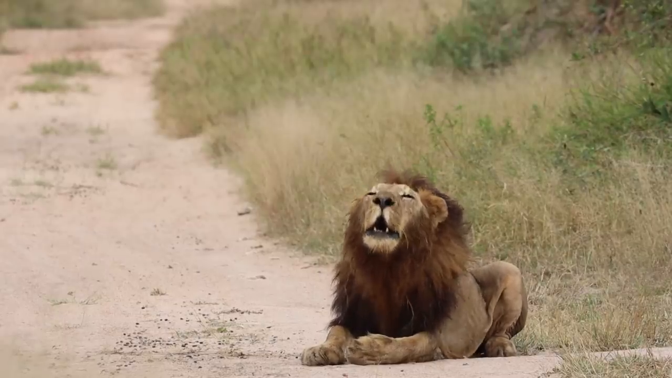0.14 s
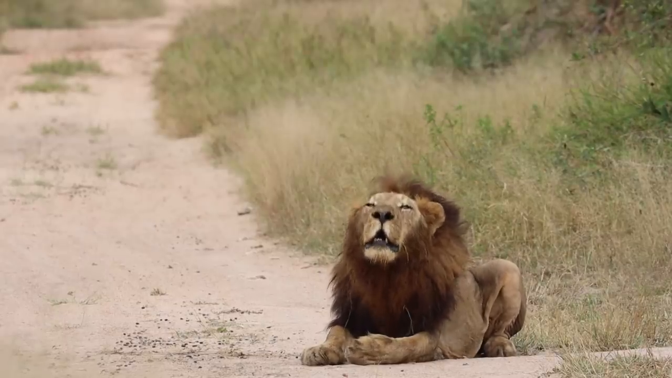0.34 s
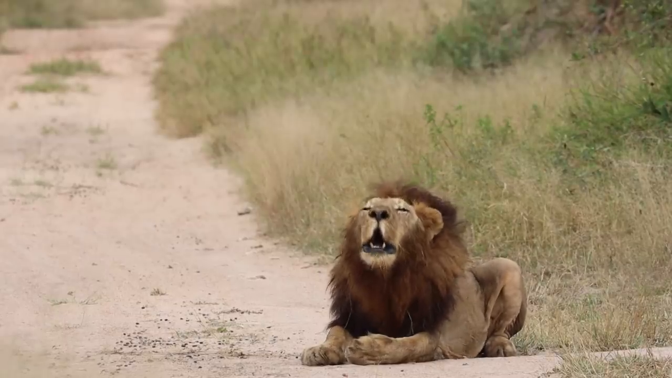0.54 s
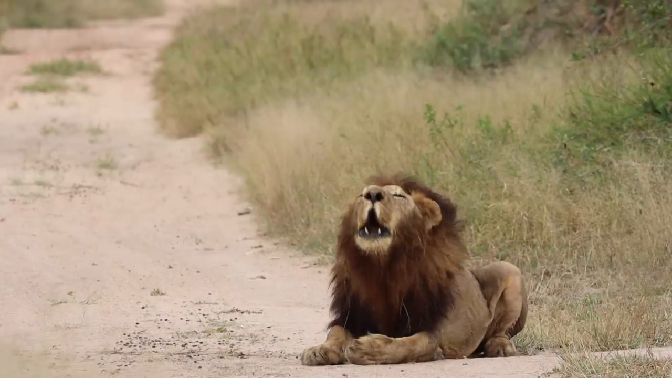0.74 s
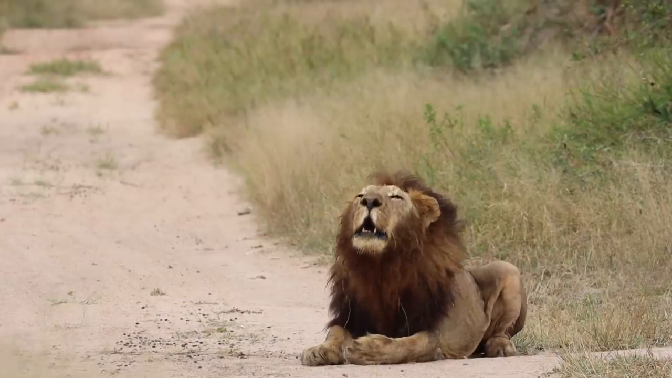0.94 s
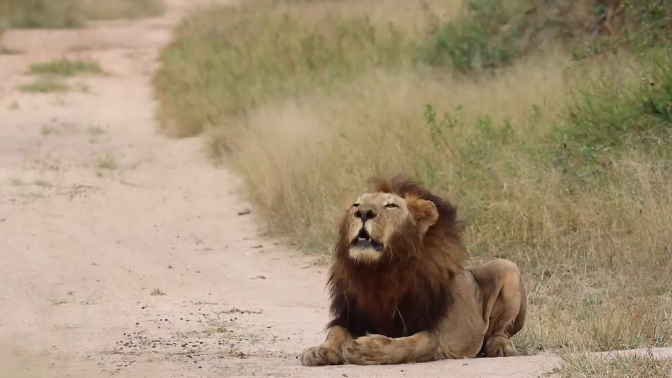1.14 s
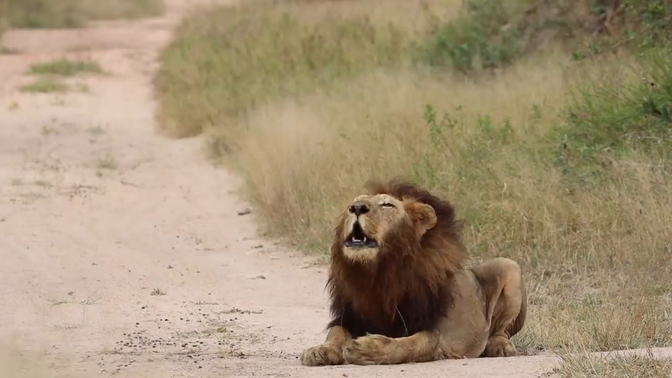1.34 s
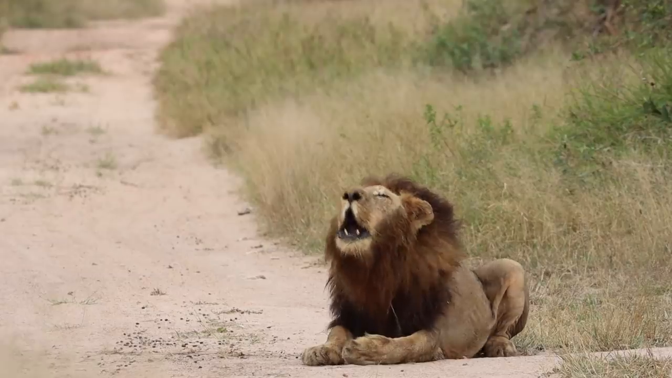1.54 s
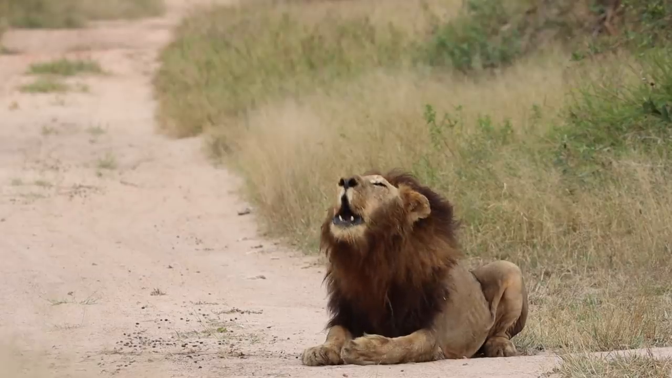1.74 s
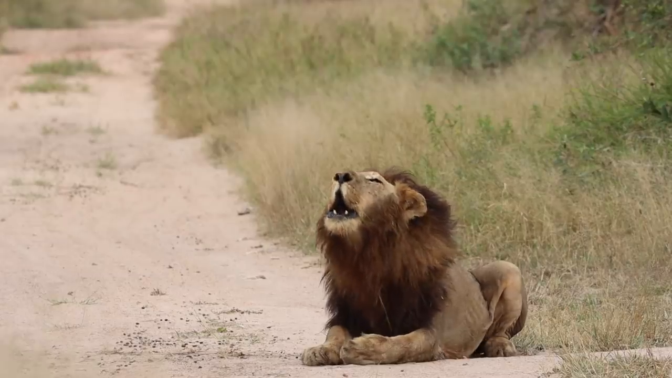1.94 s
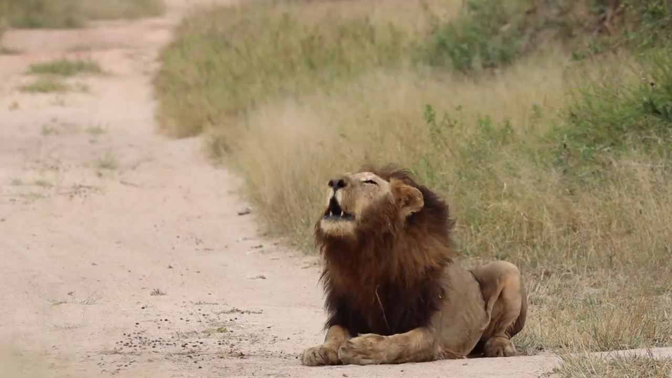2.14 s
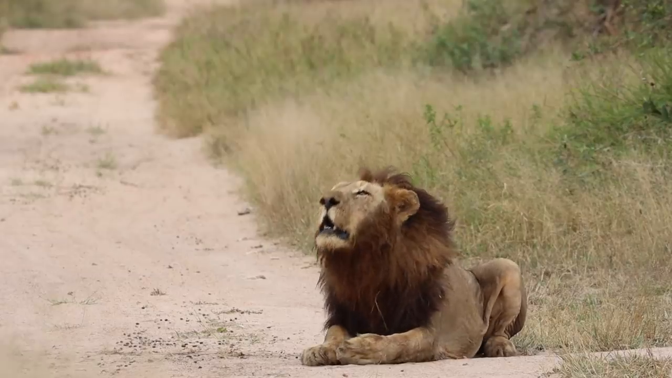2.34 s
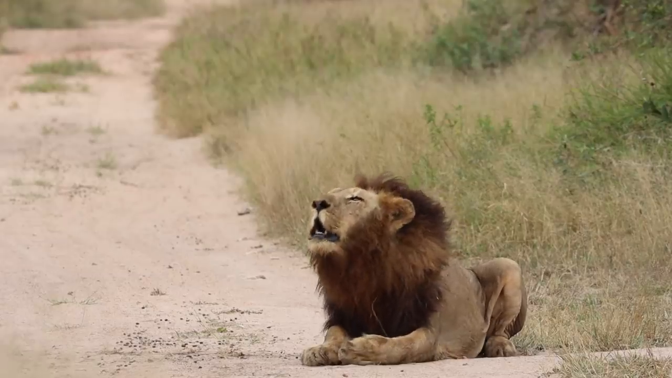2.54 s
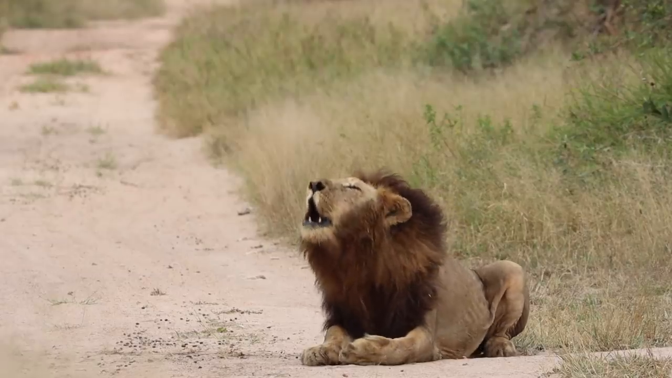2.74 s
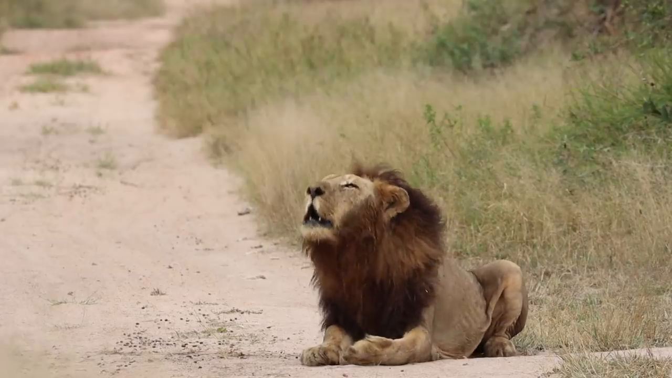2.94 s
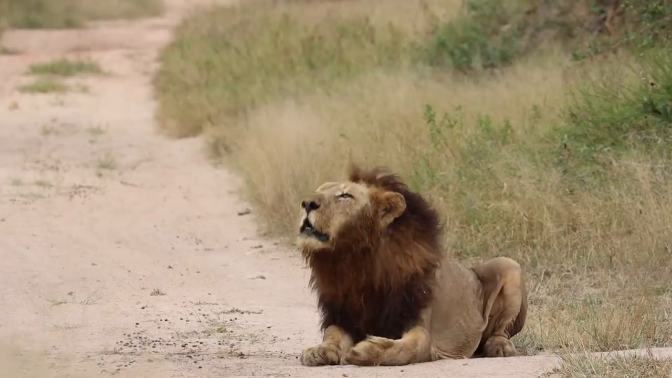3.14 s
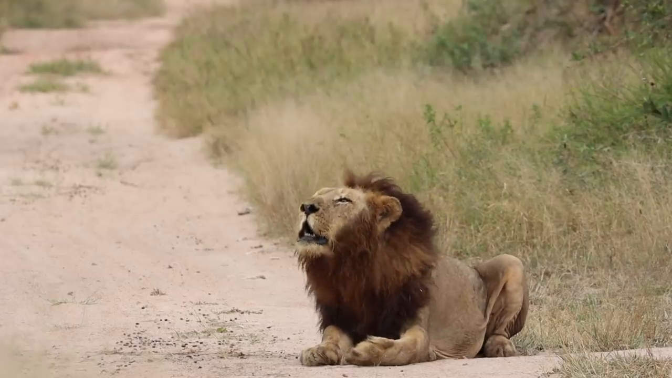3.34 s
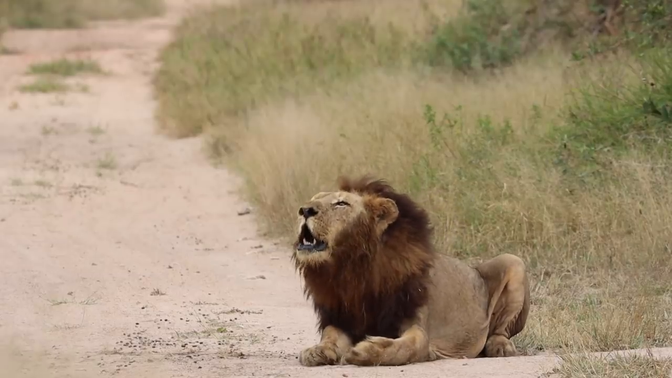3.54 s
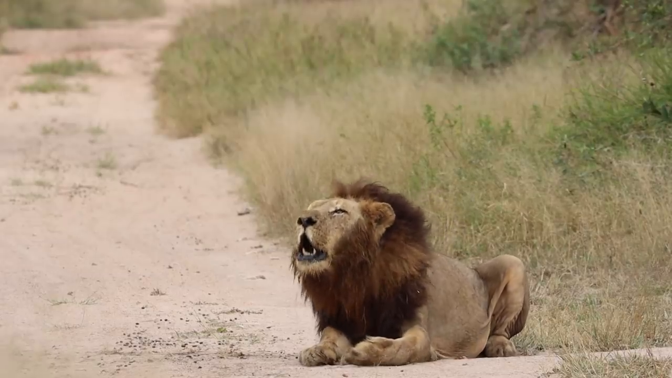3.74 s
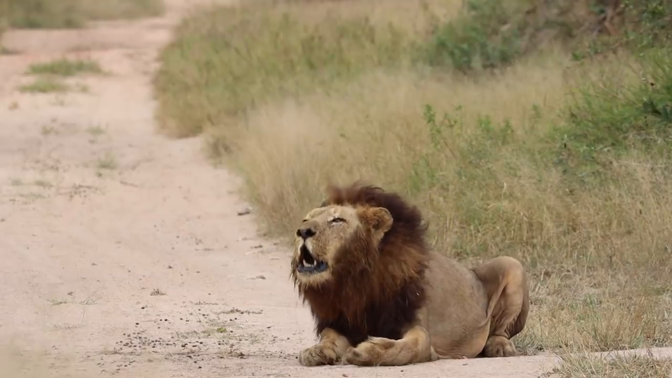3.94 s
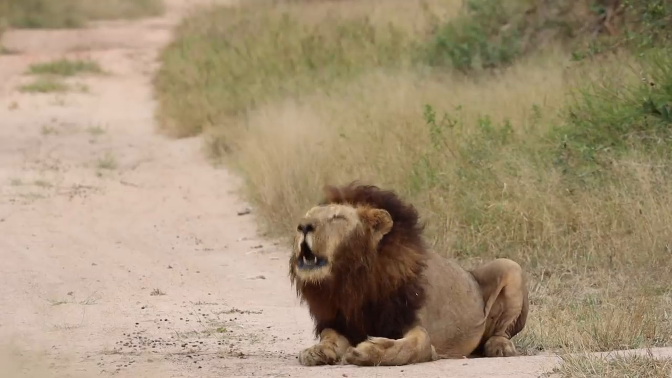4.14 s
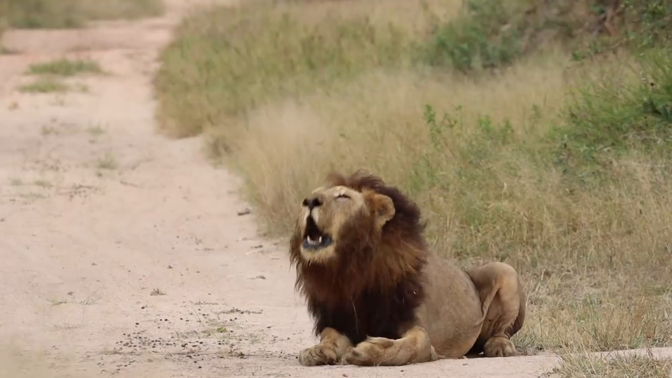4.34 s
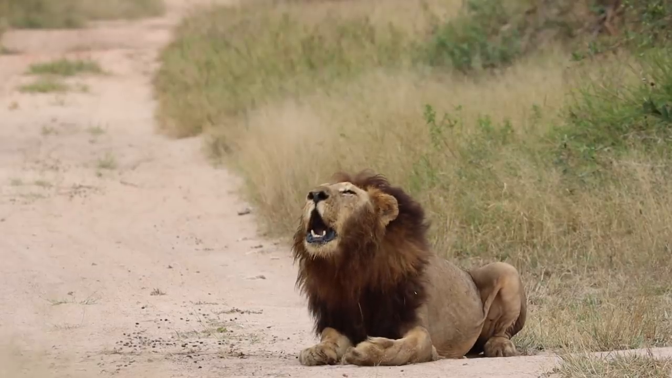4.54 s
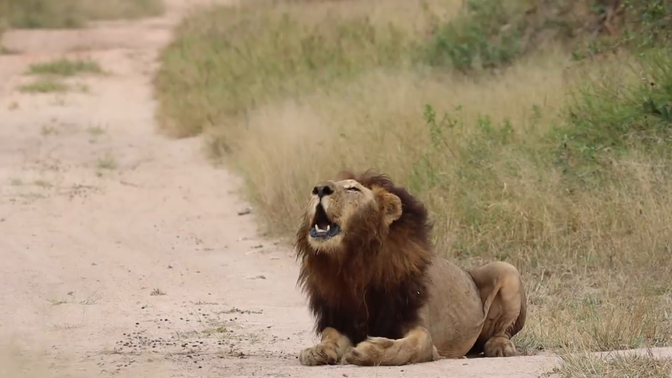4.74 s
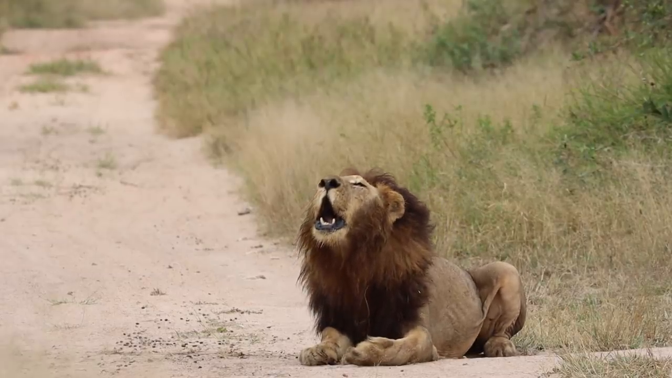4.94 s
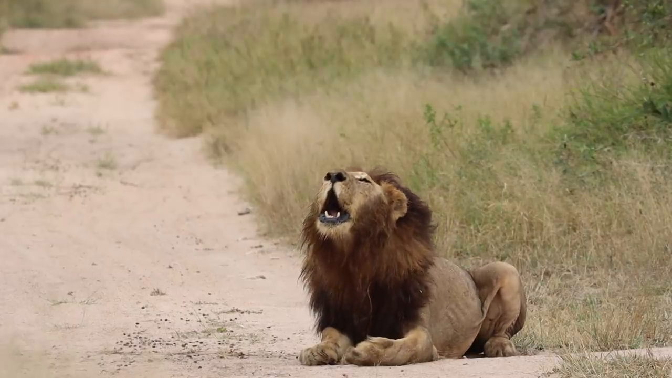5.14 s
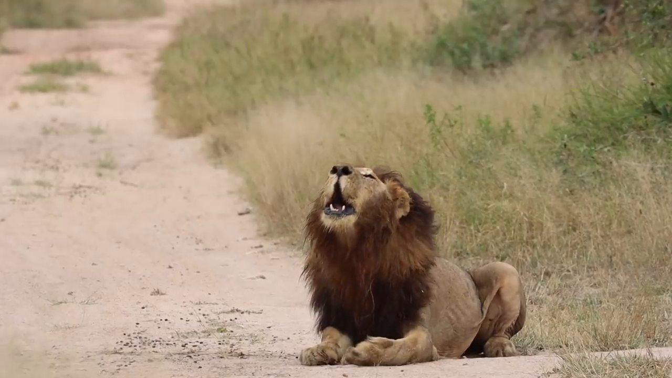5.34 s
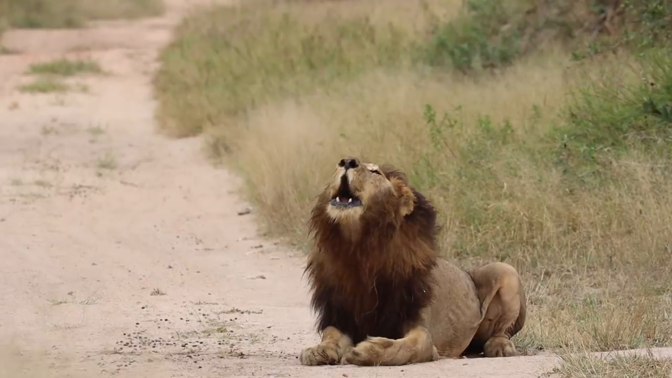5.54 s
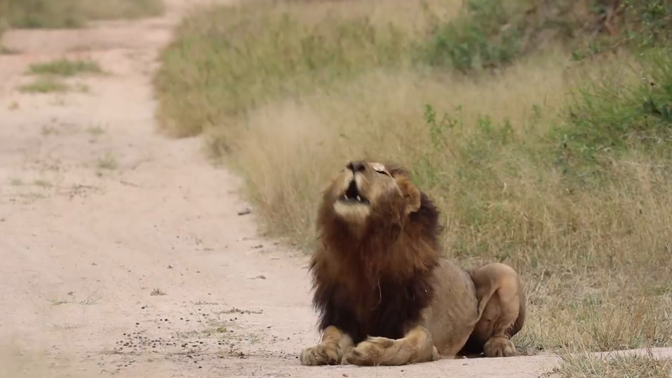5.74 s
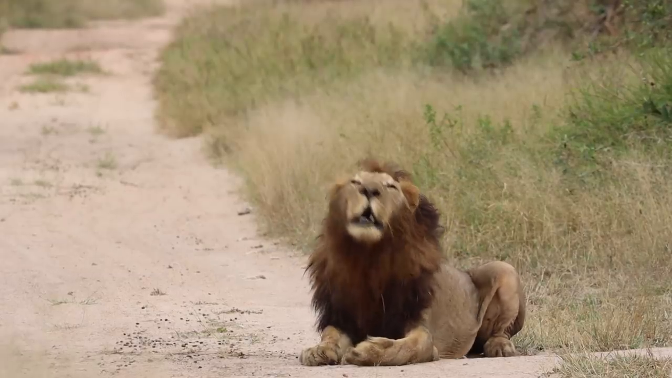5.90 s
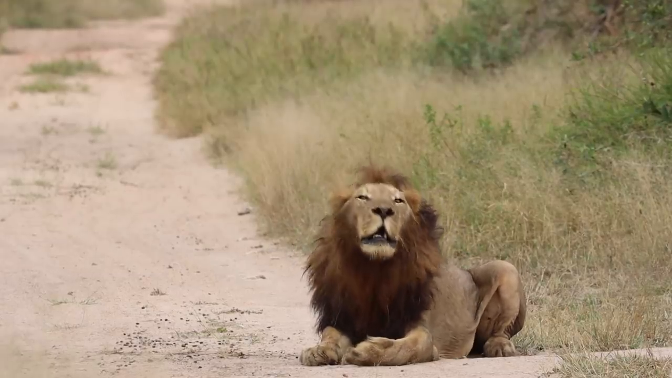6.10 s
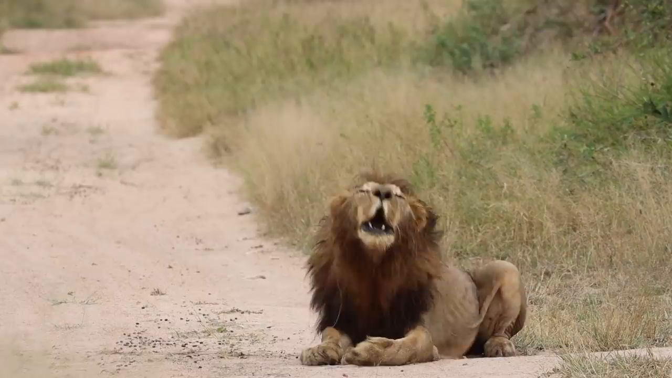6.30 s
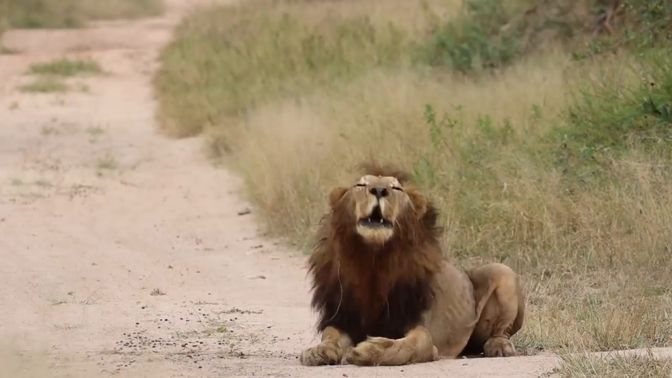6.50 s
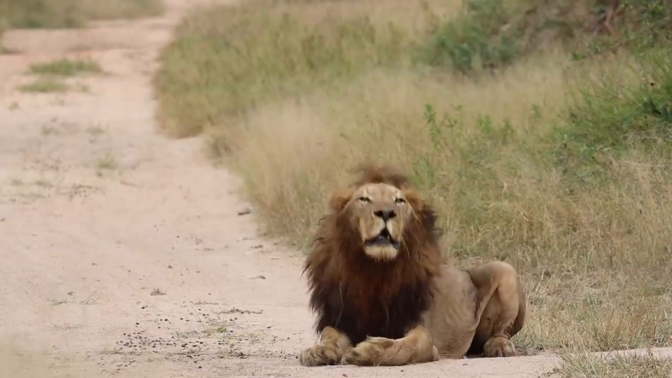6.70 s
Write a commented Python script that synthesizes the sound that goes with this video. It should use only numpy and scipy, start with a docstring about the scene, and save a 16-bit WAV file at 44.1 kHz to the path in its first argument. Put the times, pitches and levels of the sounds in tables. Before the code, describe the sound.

Deep, raspy lion grunts sag in pitch, followed by one long moaning roar and a last short grunt, echoing dully across open grassland.

```python
"""On a sandy track in open bush a male lion calls: four hoarse grunts, a long moan breaking into a roar, one more grunt.
The voice is a sine fundamental plus overtones when the folds swing evenly, or resonated fold slaps when they rasp.
Fluttering noise gives snored breaths in before four calls; sliding sines give throat bubbles and far bird chirps.
Narrow pulsing noise makes insects, shaped noise the air in leaves, short ringing modes the grass ticks.
A decaying noise tail returns a dull echo of the lion; faint microphone hiss lies in the top octave."""
import sys
import numpy as np
from scipy import signal
from scipy.fft import rfft, irfft, next_fast_len
from scipy.io import wavfile
from scipy.ndimage import uniform_filter1d, map_coordinates

SR = 44100
rng = np.random.default_rng(int(sys.argv[2]) if len(sys.argv) > 2 else 0)


def invert_db(level):
    """Linear amplitude ratio for a level in decibels (20 dB per decade), elementwise."""
    return 10 ** (np.asarray(level, dtype=float) / 20)


def wav_record(signal):
    """Record a signal, one row per channel, as 16-bit PCM in the file named by sys.argv[1]."""
    frames = np.transpose(np.atleast_2d(signal))
    bounded = np.clip(frames, -1, 1)
    # unit amplitude maps onto the largest positive 16-bit level
    quanta = np.round(bounded * 32767).astype(np.int16)
    wavfile.write(sys.argv[1], SR, quanta)


N = 298116
TIME = np.arange(N) / SR

# Breath colour at the front of the mouth. Each row: frequency in Hz, relative density in dB per Hz.
TEETH_COLOUR = [(1300, -23), (1900, -11.5), (2380, -8), (2750, -7.5), (3160, -7.5), (3620, -9.5),
                (4400, -9.5), (5300, -10.5), (6200, -18), (7000, -37), (8500, -52)]
# Colour of thin air at the lips. Each row: frequency in Hz, relative density in dB per Hz.
LIP_AIR_COLOUR = [(5500, -20), (7000, 3.5), (8300, -0.5), (10000, -2.5), (12300, 2), (13500, -11),
                  (15600, -21)]


def unit(x):
    """Scale to rms 1."""
    return x / np.sqrt(np.mean(x ** 2) + 1e-20)


def along(points, hz):
    """Interpolate (Hz, value) points on a log frequency axis."""
    f, v = np.transpose(points)
    return np.interp(np.log(hz + 1), np.log(f + 1), v)


def curves(rows):
    """One value per sample for each column after the time, corners rounded over 10 ms."""
    s, *cols = np.transpose(rows)
    return [uniform_filter1d(np.interp(TIME, s, c), size=SR // 100).round(decimals=6) for c in cols]


def sounding(tables):
    """1 inside the time span of each table, fading to 0 outside."""
    fade_s = .02
    gates = []
    for rows in tables:
        inside_s = np.minimum(TIME - rows[0][0], rows[-1][0] - TIME)
        gates.append(np.clip(1 + inside_s / fade_s, 0, 1))
    return np.clip(sum(gates), 0, 1)


def wobble(rate):
    """Smooth random curve, rate knots a second."""
    return map_coordinates(rng.standard_normal(int(N * rate / SR) + 4), [TIME * rate])


def filtered(x, response):
    """Multiply the spectrum of x by a complex response of frequency."""
    m = next_fast_len(N + SR // 2)
    return irfft(rfft(x, m) * response(np.fft.rfftfreq(m, 1 / SR)), m)[..., :N]


def coloured(x, points):
    """Shape x by (Hz, dB) points and scale to rms 1."""
    return unit(filtered(x, lambda hz: invert_db(along(points, hz))))


def resonant(x, peaks, low_hz):
    """Causal resonances (Hz, width Hz, dB) and a steep low cut, held at a running rms of 1."""
    def response(f):
        body = 0
        for k, (centre, width, db) in enumerate(peaks):
            body = body + (-1) ** k * invert_db(db) * 1j * f * width / (centre ** 2 - f * f + 1j * f * width)
        cut = (-f * f / (low_hz ** 2 - f * f + 1.4j * f * low_hz)) ** 2
        return body * cut

    y = filtered(x, response)
    return y / np.sqrt(np.abs(uniform_filter1d(y ** 2, SR // 16)) + 1e-12)


def patches(x, depth_db, size, bins, frames):
    """Random gain in soft patches over time and frequency."""
    z = signal.stft(x, nperseg=size)[2]
    field = uniform_filter1d(rng.standard_normal(z.shape[-2:]), bins, 0)
    field = uniform_filter1d(field, frames, 1)
    return signal.istft(z * invert_db(depth_db * unit(field)), nperseg=size)[1][..., :N]


def glides(rows):
    """Short sines sliding linearly in pitch under a half-sine swell."""
    out = np.zeros(N + SR)
    for s, db, start_hz, end_hz, length_s in rows:
        u = np.linspace(0, 1, round(length_s * SR))
        tone = np.sin(2 * np.pi * length_s * (start_hz * u + (end_hz - start_hz) * u ** 2 / 2))
        out[round(s * SR):][:len(u)] += invert_db(db) * np.sqrt(2) * np.sin(np.pi * u) * tone
    return out[:N]


def microphone_hiss():
    """Faint steady microphone noise, heard in the top octave."""
    hiss = filtered(rng.standard_normal((2, N)), lambda hz: 1 / (1 + (11000 / (hz + 1)) ** 6))
    return invert_db(-76.5) * unit(hiss)


def bush():
    """Soft air in grass and leaves: shaped noise whose stereo likeness varies with frequency."""
    # Each row: frequency in Hz, relative density in dB per Hz.
    colour = [(25, -35), (70, -6.5), (140, 0.5), (250, -11), (420, 2.5), (550, -3), (700, -7.5),
              (850, -6.5), (1160, -7.5), (1700, -15), (3300, -20), (6700, -24.5), (12000, -29),
              (14000, -33), (15700, -38.5)]
    # Each row: frequency in Hz, left-right correlation.
    likeness = [(60, 0.37), (240, 1), (950, -0.0099), (3770, -0.085), (15000, -0.12)]
    mid_rms_db = -54.5

    def response(hz):
        angle = np.arccos(np.clip(along(likeness, hz), -1, 1)) / 2
        return invert_db(along(colour, hz)) * [np.cos(angle), np.sin(angle)]

    pair = patches(rng.standard_normal((2, N)), depth_db=1.0, size=512, bins=5, frames=12)
    mid, side = filtered(pair, response)
    return invert_db(mid_rms_db) * np.array([mid + side, mid - side]) / np.std(mid)


def insects():
    """Shrill insects: narrow pulsing noise bands, nearly alike in both channels."""
    # Each row: centre in Hz, half-width in Hz, rms level in dB, pulses per second.
    bands = [(2365, 68, -69, 55), (6550, 90, -80, 6.7)]
    out = np.zeros((2, N))
    for hz, width, db, rate in bands:
        pulse = 1 + .7 * np.cos(2 * np.pi * rate * TIME + 2 * wobble(7.5))
        pulse *= invert_db(2.2 * wobble(0.9))
        band = filtered(pulse * rng.standard_normal((2, N)), lambda f: 1 / (1 + ((f - hz) / width) ** 2))
        out += invert_db(db) * unit(band + 0.86 * band[::-1])
    return out


def far_birds():
    """Far chirps: short sliding sines, stronger on the left."""
    # Each row: start in seconds, mid-channel level in dB, start in Hz, end in Hz, length in seconds.
    chirps = [(.28, -72, 7600, 8000, .08), (.49, -70, 8000, 8900, .05), (1.05, -69, 2120, 2400, .14),
              (2.2, -69, 2120, 2400, .14), (2.4, -70, 9500, 8500, .05), (3.36, -69, 2000, 2300, .14),
              (3.49, -68, 7800, 8400, .045), (3.535, -72, 8500, 9000, .02)]
    return glides(chirps) * invert_db(np.array([[2], [-2]]))


def echo(x, spread=0.19):
    """Ground, grass and trees scatter the call back; each frequency dies at its own speed."""
    # Each row: frequency in Hz, t60 in seconds.
    decay = [(100, 0.43), (150, 1.35), (400, 1), (1500, 0.5), (8000, 0.067)]
    # Each row: frequency in Hz, relative level in dB.
    colour = [(60, -51.5), (140, -19.5), (400, -34.5), (1500, -14.5), (8000, -33.5)]
    hz, t, z = signal.stft(rng.standard_normal((2, 2 * SR)), SR, nperseg=1024)
    z = z * invert_db(-60 * t / along(decay, hz)[:, None])
    z = z / np.linalg.norm(z[0], axis=1)[:, None]
    tails = signal.istft(z, SR, nperseg=1024)[1]
    shared, apart = tails / np.linalg.norm(tails[0])
    far = filtered(x, lambda f: invert_db(along(colour, f)))
    stereo_tail = [shared + spread * apart, shared - spread * apart]
    return signal.fftconvolve(far[None], stereo_tail, axes=1)[:, :N]


def ticks():
    """Nearby grass ticks: a few short modes ringing after a fast onset."""
    # Each row: time in seconds, nominal peak in dB.
    times = [(1.186, -42), (1.465, -29), (3.389, -41.5), (3.598, -41.5), (4.101, -41)]
    # Modes of what ticks. Each row: frequency in Hz, relative level in dB, t60 in seconds.
    modes = [(1170, 5.5, 0.035), (2380, 2, 0.032), (4450, -5, 0.023)]
    out, t = np.zeros(N + SR), TIME[:SR // 20]
    for s, db in times:
        ring = 0
        for hz, level_db, t60_s in modes:
            ring = ring + invert_db(level_db + rng.normal(0, 0.82) - 60 * t / t60_s) * np.sin(2 * np.pi * hz * t)
        onset = 1 - np.exp(-t / .0004)
        out[round(s * SR):][:len(t)] += invert_db(db - 7.5) * ring * onset
    return out[:N]


def inhale():
    """Air drawn in makes the soft palate flutter near 30 Hz: a soft snore through resonances."""
    # Each row: peak in seconds, snore level in dB, swell in seconds.
    peaks = [(.63, -41.5, 0.24), (1.518, -32.5, 0.22), (2.668, -42.5, 0.22), (6.292, -40.5, 0.11)]
    swell_db, cut_s, cut_db = 17.5, 0.049, 8  # rise to the peak, then a quick drop
    mouth_db, hiss_db, thin_db = -6, -18.5, -33.5  # relative to the snore
    breaths = [[(s - swell_s, db - swell_db), (s, db), (s + cut_s, db - cut_db)] for s, db, swell_s in peaks]
    snore_db, = curves(np.concatenate(breaths))
    flutter = invert_db(4.6 * np.cos(2 * np.pi * 30 * TIME + 5.2 * wobble(22)) + 1.95 * wobble(40))
    air = flutter * rng.standard_normal((4, N))
    snore = resonant(air[0], [(94.4, 41, -5.0), (171.6, 21.6, 4.0)], low_hz=50.2)
    mouth = resonant(air[1], [(404, 47, 5.5), (744, 80, -5), (1047, 120, -7.0)], low_hz=220)
    hiss = coloured(air[2], TEETH_COLOUR)
    thin = coloured(air[3], LIP_AIR_COLOUR)
    layers = snore + invert_db(mouth_db) * mouth + invert_db(hiss_db) * hiss + invert_db(thin_db) * thin
    return sounding(breaths) * invert_db(snore_db + 0.9 * wobble(18)) * layers


def throat_bubbles():
    """Bubbles in the throat: short sines gliding in pitch."""
    # Each row: start in seconds, level in dB, start in Hz, end in Hz, length in seconds.
    gulps = [(2.12, -29, 520, 750, .03), (5.722, -22, 560, 880, .045), (5.77, -23, 390, 480, .045),
             (5.805, -32, 550, 950, .04)]
    return glides(gulps)


def pitch_curve():
    """Fold rate in Hz: each grunt holds, then sags; the long call follows its own line."""
    # Each row: start in seconds, sag start in seconds, held Hz, sag end in seconds, last Hz.
    grunts = [(0, -0.001, 158.2, .19, 106.4), (0.681, 0.719, 152.7, .92, 121.1),
              (1.58, 1.832, 152.3, 2.15, 121.7), (2.722, 2.857, 139.7, 2.95, 121),
              (6.381, 6.48, 144.4, 6.53, 119.6)]
    # Moan and roar. Each row: time in seconds, pitch in Hz.
    moan = [(4.171, 125.1), (4.22, 135.1), (4.265, 153.9), (4.324, 155.8), (4.392, 194.4), (4.436, 215.7),
            (4.468, 220), (4.513, 220), (4.556, 210.8), (4.616, 209.9), (4.666, 214.6), (4.706, 215.2),
            (4.732, 200), (4.925, 190.2), (4.99, 195.4), (5.104, 193.1), (5.14, 205.8), (5.259, 206.5),
            (5.29, 169.3), (5.468, 164.4), (5.512, 156.5), (5.574, 156.9), (5.663, 140.1), (5.71, 139.4),
            (5.75, 120)]
    points = []
    for s, sag_s, hz, end_s, end_hz in grunts:
        points += [(s, hz), (sag_s, hz), (end_s, end_hz), (end_s + .2, end_hz)]
    last_s, last_hz = moan[-1]
    return curves(sorted(points + moan + [(last_s + .3, last_hz)]))[0]


def fold_state():
    """Vocal-fold settings over time, gliding from one way of working to the next."""
    # Each way: rasp share of the throat band 0-1, rasp share above it 0-1, disorder 0-1,
    # depth of a repeating pattern 0-1, cycles in the pattern, share of the hiss ringing behind the teeth 0-1.
    ways = {"hoarse": (.9, 1, .75, .35, 3, .15), "barking": (.85, 1, .6, .4, 4, .5),
            "beating": (1, 1, .25, .95, 3, .12), "clearing": (.8, .6, .35, .2, 4, .3),
            "settling": (.015, .2, .3, 0, 4, .4), "clear": (0, .01, .3, 0, 4, .4),
            "cracking": (.45, 1, .9, .3, 3, .6), "ringing": (.1, 1, .85, .3, 3, .7)}
    # Each row: start in seconds, way the folds work from then on.
    register = [(0, "hoarse"), (1.65, "beating"), (1.889, "hoarse"), (2.701, "barking"), (4.1, "hoarse"),
                (4.35, "clearing"), (4.408, "settling"), (4.51, "clear"), (4.7, "settling"),
                (4.75, "clear"), (4.985, "cracking"), (5.14, "ringing"), (5.281, "beating"),
                (5.579, "hoarse"), (6.299, "barking")]
    shift_s = 0.033
    which = np.searchsorted([s for s, way in register], TIME, side="right") - 1
    rows = np.array([ways[way] for s, way in register])[which].T
    return np.clip(uniform_filter1d(rows, round(shift_s * SR), axis=1), 0, None).round(decimals=6)


def fold_slaps(cycles, swing, disorder):
    """Folds slap once a cycle, early or late and uneven in size, each with a puff of noise."""
    beat = cycles + .1 * disorder * wobble(150) + .22 * swing
    at = np.flatnonzero(np.diff(np.floor(beat)) > 0)
    size = invert_db(2.2 * disorder * wobble(120) + 3.5 * swing)
    pulses = np.zeros(N)
    pulses[at] = size[at]
    puff = size * (0.73 + 0.2 * np.cos(2 * np.pi * beat)) ** 2 * rng.standard_normal(N)
    slaps = unit(pulses) + 1.1 * disorder * unit(puff)
    # tongue and soft tissue shift about
    return patches(slaps, depth_db=2.5, size=2048, bins=4, frames=2), puff


def through_jaw(slaps, shapes, shut, low_hz):
    """Resonances crossfade from the open to the closing jaw."""
    open_jaw = resonant(slaps, shapes[0], low_hz)
    closing_jaw = resonant(slaps, shapes[1], low_hz)
    return np.sqrt(1 - shut) * open_jaw + np.sqrt(shut) * closing_jaw


def throat_band(slaps, phase, rasp, shut):
    """Second harmonic for even folds, throat resonances rung by the slaps for rasping ones."""
    # Jaw open, then closing. Each row: frequency in Hz, width in Hz, relative level in dB.
    shapes = [
        [(304, 129, 5), (430.5, 129, 8)],
        [(239.5, 31, 2.5), (398, 92.6, -6)],
    ]
    clear = np.sqrt(2 - 2 * rasp) * np.sin(2 * phase + 0.5)
    return clear + 0.92 * np.sqrt(rasp) * through_jaw(slaps, shapes, shut, low_hz=200)


def mouth_band(slaps, phase, rasp, shut, wide):
    """Overtones shaped by the lips for even folds, mouth resonances rung by the slaps for rasping ones."""
    # Jaw open, then closing. Each row: frequency in Hz, width in Hz, relative level in dB.
    shapes = [
        [(685, 53.5, 0.5), (806, 76.5, -3.5), (1098, 72, -6), (1425, 108, -16.5)],
        [(633, 67, 2), (752, 45.4, 8), (1070, 69, 0), (1220, 150, -15.5)],
    ]
    # Each row: multiple of the pitch, relative dB with rounded lips, relative dB with wide lips.
    overtones = [(3, -17, -22), (4, -24, -26), (5, -37, -32), (6, -23, -38), (7, -44, -37), (8, -44, -44),
                 (9, -57, -52)]
    stack, power = 0, 0
    for k, round_db, wide_db in overtones:
        gain = invert_db((1 - wide) * round_db + wide * wide_db + 2.5 * wobble(9.8))
        stack = stack + gain * np.sin(k * (phase + 1))
        power = power + gain ** 2
    stack = stack * np.sqrt(2 / power)
    return np.sqrt(1 - rasp) * stack + 0.78 * np.sqrt(rasp) * through_jaw(slaps, shapes, shut, low_hz=435)


def high_overtones(phase, pitch, wide):
    """Harmonics 10 to 33, peaking at a front resonance that climbs as the lips widen."""
    front_hz = 3050 + 600 * wide
    shine, power = 0, 0
    for k in range(10, 34):
        peak = .25 + 1 / (1 + ((k * pitch - front_hz) / 450) ** 2)
        gain = invert_db(5 * wobble(11) - k / 3) * peak
        shine = shine + gain * np.sin(k * phase + 0.27 * k * k)
        power = power + gain ** 2
    return shine * np.sqrt(2 / power)


def teeth_hiss(puff, phase, pitch, rasp, strain, wide):
    """Air tears past the teeth once a cycle; high overtones largely replace it in the clear moan."""
    # Narrow space behind the teeth. Each row: frequency in Hz, width in Hz, relative level in dB.
    ring = [(2940, 27, -19.5), (2954, 204, 6.5), (3232, 100, 8)]
    hiss = coloured(puff + 0.69 * rng.standard_normal(N), TEETH_COLOUR)
    hiss = unit(patches(hiss, depth_db=2, size=512, bins=10, frames=4))
    hiss = np.sqrt(1 - strain) * hiss + np.sqrt(strain) * resonant(puff, ring, low_hz=2000)
    noisy = np.clip(.12 + rasp, 0, 1)
    return np.sqrt(noisy) * hiss + np.sqrt(1 - noisy) * high_overtones(phase, pitch, wide)


def lip_air(puff):
    """Thin air noise at the lips, partly pulsed by the folds."""
    air = coloured(puff + 1.2 * rng.standard_normal(N), LIP_AIR_COLOUR)
    return unit(patches(air, depth_db=1.5, size=512, bins=20, frames=4))


def roar():
    """Firm fundamental; above it clear overtones when the folds swing evenly, a rasp when they slap."""
    # In these three tables each row: time in seconds, voice level in dB, push of breath as mouth band re voice in dB.
    short_grunts = [
        [(0.0, -15.5, -19.5), (0.03, -11, -3), (0.066, -14, -14.5), (0.084, -21, -8.5), (0.118, -15.5, -9),
         (0.144, -15, -8.5), (0.256, -53, -19), (0.27, -56, -30)],
        [(0.68, -54.5, -23), (0.71, -25.5, -31), (0.75, -14, 1), (0.764, -10.5, -14.5), (0.792, -18, -10.5),
         (0.814, -17.5, -20), (0.844, -14, -0.5), (0.9, -19.5, -17.5), (0.954, -18.5, -12.5),
         (0.972, -29.5, -14.5), (1.06, -50, -21)],
        [(2.72, -64, -14), (2.746, -34.5, -32), (2.76, -25.5, -20), (2.804, -15, -9.5), (2.836, -12.5, -12),
         (2.85, -12, -11.5), (2.898, -21, -5), (2.904, -16, -23.5), (2.918, -11.5, -8.5), (2.952, -21.5, -18.5),
         (3.06, -53, -22.5)],
        [(6.38, -61, -21), (6.402, -31, -10), (6.432, -16, -11.5), (6.452, -12, -6.5), (6.472, -11.5, -13),
         (6.51, -14, -13.5), (6.526, -14.5, -22.5), (6.574, -16, -12.5), (6.636, -40.5, -21), (6.656, -38, -35),
         (6.72, -63, -7.5)],
    ]
    long_grunt = [(1.58, -51, 0), (1.6, -33, -23), (1.624, -23, -3), (1.662, -8.5, -7), (1.704, -11, -17),
                  (1.796, -12.5, -13), (1.83, -12.5, -13.5), (1.866, -17, -8), (1.896, -25.5, -13.5),
                  (1.984, -18, -7), (2.002, -23, -15.5), (2.13, -15.5, -9.5), (2.188, -22.5, -19),
                  (2.22, -40.5, -13.5), (2.248, -38, -21), (2.27, -55, -12)]
    moan_and_roar = [(4.17, -71, -0.5), (4.178, -56.5, -37.5), (4.194, -30.5, -13), (4.292, -14, -7.5),
                     (4.318, -11.5, -17), (4.382, -14.5, -16), (4.53, -10.5, -24.5), (4.576, -14, -13),
                     (4.704, -12.5, -17), (4.72, -13.5, -22), (4.864, -10.5, -19), (4.978, -13, -19.5),
                     (5.002, -13.5, -13.5), (5.14, -14, -11), (5.166, -13.5, -11.5), (5.294, -12, -13),
                     (5.314, -11, -15.5), (5.558, -11.5, -16.5), (5.582, -24, -14.5), (5.636, -15.5, -10.5),
                     (5.692, -22, -17), (5.726, -15.5, -5), (5.75, -27, -2.5), (5.79, -16, -15),
                     (5.83, -37.5, 0), (5.85, -31, -21), (5.9, -45, -14), (5.95, -55.5, -15)]
    # Each row: time in seconds, lip shape from 0 rounded to 1 wide.
    lips = [(4.7, 0.0042), (4.75, 0.97)]
    calls = sorted(short_grunts + [long_grunt, moan_and_roar])
    voice_db, push_db = curves(np.concatenate(calls))
    pitch = pitch_curve()
    rasp_low, rasp_high, disorder, depth, period, strain = fold_state()
    unsteady, clear = rasp_low * disorder, 1 - rasp_high
    shut = np.clip((148 - pitch) / 18, 0, 1)  # the jaw closes as the pitch sags
    wide, = curves(lips)
    extra_db = push_db + 12  # push beyond the middling -12 dB

    # throat band re fundamental
    over_db = -11 + 0.34 * rasp_low * extra_db + 7.5 * shut + 8 * strain * rasp_high
    # a closing call loses its fundamental first as it fades
    over_db += 0.31 * shut * np.clip(-23 - voice_db, 0, 18)
    # the throat takes over when twice the pitch meets its resonance; less with wide lips in the clear moan
    octave_hz, octave_width_hz = 423.5, 12.4
    over_db += 18 / (1 + ((2 * pitch - octave_hz) / octave_width_hz) ** 2)
    over_db -= 5 * wide * clear
    fund_db = voice_db - 10 * np.log10(1 + invert_db(2 * over_db))  # fundamental and throat share the voice
    throat_db, mouth_db = fund_db + over_db, voice_db + push_db
    hiss_db = voice_db - 27.5 + 0.61 * extra_db + 7.5 * strain - 9.5 * clear
    hiss_db += 4.5 * unsteady * wobble(62)  # uneven slaps make the breath noise spit
    air_db = hiss_db - 12 - 1.5 * shut + 1.5 * clear
    thump_db = voice_db - 45 + 16 * shut - 22 * clear + 12 * depth

    cycles = np.cumsum(pitch) / SR
    phase = 2 * np.pi * (cycles + .09 * unsteady * wobble(45))
    fundamental = np.sqrt(2) * invert_db(fund_db + 3 * unsteady * wobble(40)) * np.sin(phase)
    swing = depth * np.cos(2 * np.pi * np.cumsum(pitch / period) / SR)
    slaps, puff = fold_slaps(cycles, swing, disorder)
    # uneven slaps blur the low end
    chest = .55 * unsteady * invert_db(fund_db) * resonant(slaps, [(200, 21.0, 0)], low_hz=120)
    throat = throat_band(slaps, phase, rasp_low, shut)
    mouth = mouth_band(slaps, phase, rasp_high, shut, wide)
    hiss = teeth_hiss(puff, phase, pitch, rasp_high, strain, wide)
    air_thump = resonant(rng.standard_normal(N), [(63.4, 51, 0)], low_hz=42)
    layers = fundamental + chest + invert_db(throat_db) * throat + invert_db(mouth_db) * mouth
    layers += invert_db(hiss_db) * hiss + invert_db(thump_db) * air_thump + invert_db(air_db) * lip_air(puff)
    return sounding(calls) * layers


def at_microphones(x):
    """Level and phase offsets by frequency set the lion a little to the right in the treble."""
    # Each row: frequency in Hz, left minus right in dB.
    lean = [(150, -1), (380, 0), (700, 0), (1000, -2), (1300, -4.5), (2000, -1.5), (3000, -1.5),
            (5000, -1.5), (12000, -1.5)]
    # Each row: frequency in Hz, phase in radians by which left leads.
    lead = [(150, 0.024), (300, 0.03), (700, 0.2), (1200, 0.68), (2500, 0.067), (10000, 0.18)]
    half = np.array([[.5], [-.5]])
    return filtered(x, lambda hz: invert_db(along(lean, hz) * half) * np.exp(1j * along(lead, hz) * half))


def scene():
    """The lion ahead in the bush, with its echo and the background."""
    lion = roar() + throat_bubbles() + inhale()
    background = bush() + insects() + far_birds() + microphone_hiss()
    return at_microphones(lion) + echo(lion) + ticks() + background


def low_pass(x):
    """Removes everything above the highest recorded frequency."""
    return signal.sosfilt(signal.butter(12, 15700, fs=SR, output="sos"), x)


def record(dry):
    """Soft saturation rounds off the loudest peaks."""
    ceiling = .9
    rounded = dry / (1 + np.abs(dry / ceiling) ** 5) ** (1 / 5)
    return low_pass(rounded)


dry = scene()
out = record(dry)
wav_record(out)
```